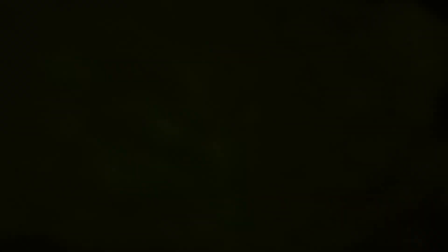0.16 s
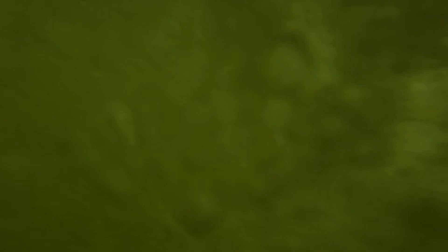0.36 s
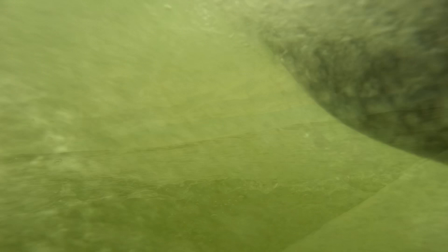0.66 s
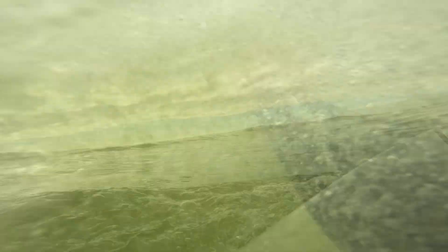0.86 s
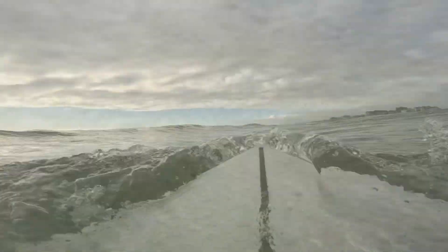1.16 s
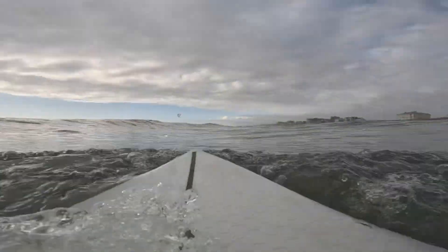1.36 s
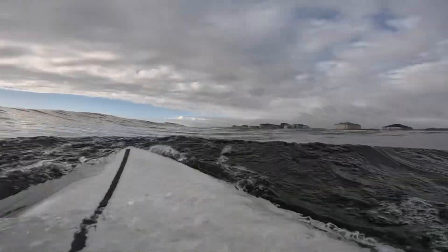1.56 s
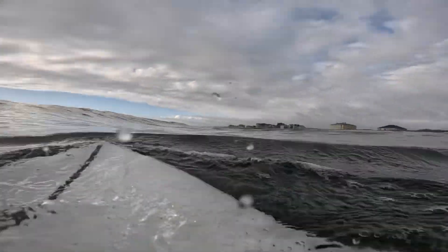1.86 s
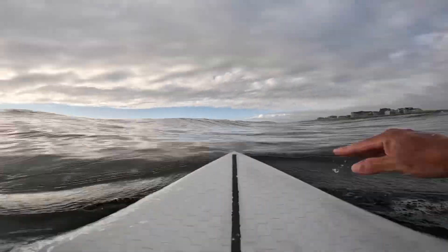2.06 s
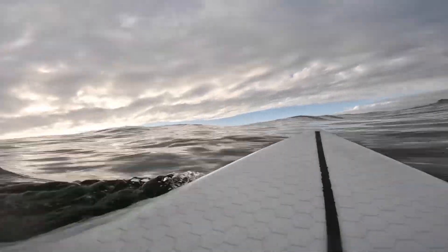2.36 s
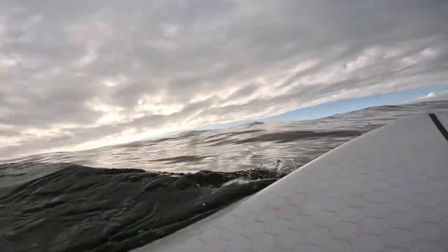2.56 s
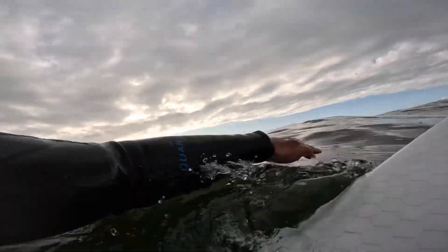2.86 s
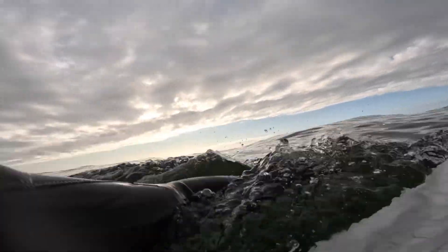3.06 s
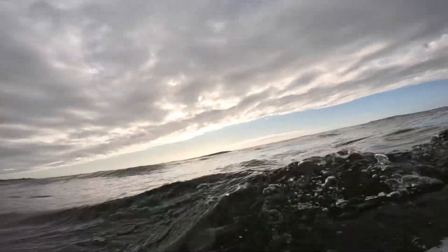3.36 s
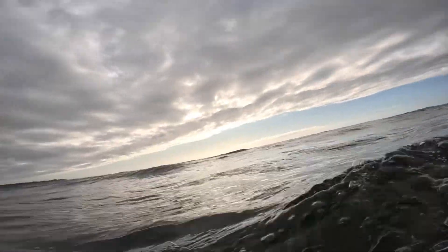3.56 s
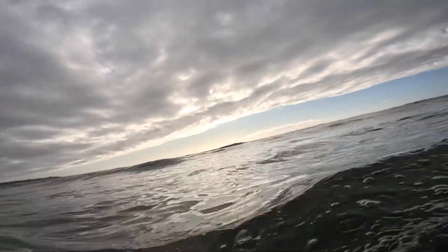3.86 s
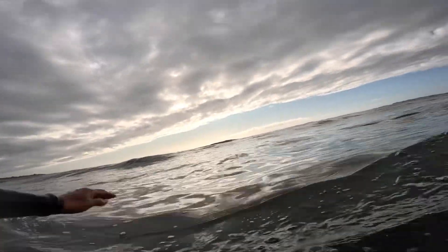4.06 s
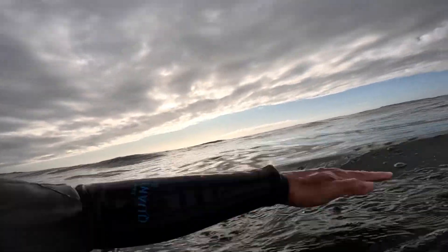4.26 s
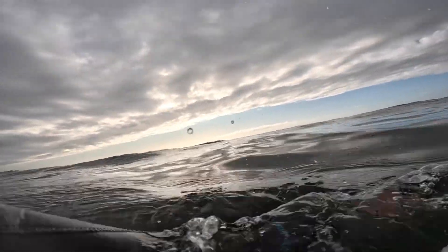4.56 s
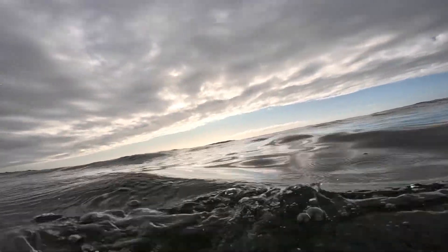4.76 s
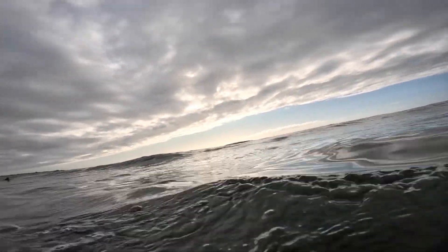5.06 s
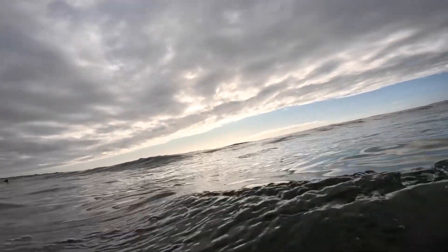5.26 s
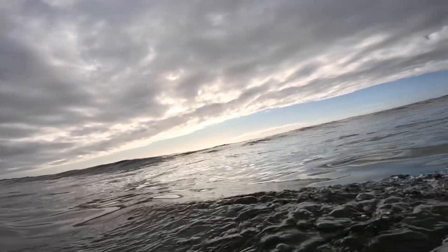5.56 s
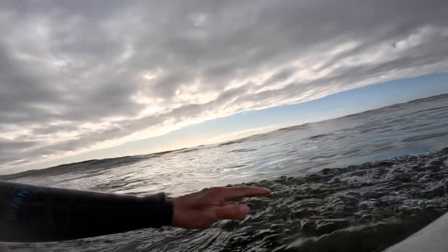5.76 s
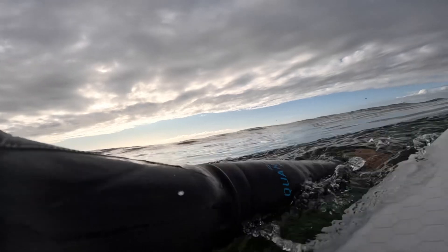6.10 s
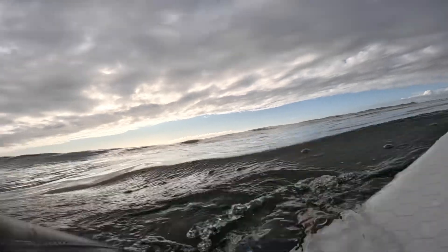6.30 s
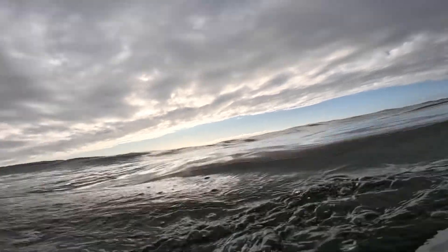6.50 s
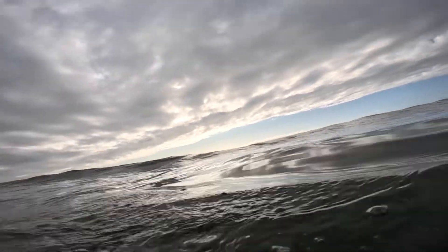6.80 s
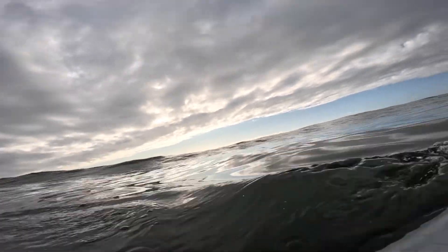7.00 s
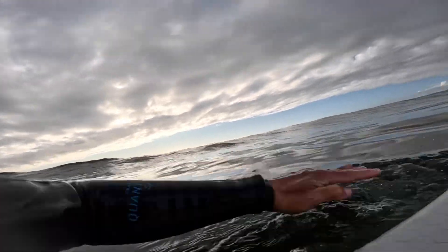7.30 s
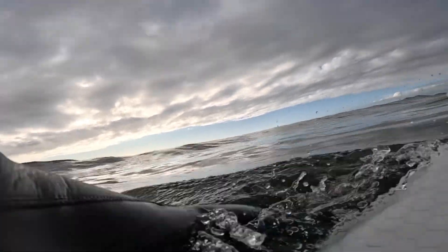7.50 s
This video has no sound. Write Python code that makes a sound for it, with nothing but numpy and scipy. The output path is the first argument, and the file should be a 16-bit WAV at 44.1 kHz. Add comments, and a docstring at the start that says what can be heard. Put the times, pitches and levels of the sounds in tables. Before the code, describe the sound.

Broken wave water roars dully and gurgles around a board, thins briefly, then breaks into thick bubbling and draining as it comes up. A booming knock, wet splats and a tight cluster of hull slaps come next. The open sea then quietens to soft washing, small drops and low swell rumble, broken by short paddle splashes and hollow knocks. Close, muffled microphones, nearly mono, widening late.

```python
"""A surfboard booms and rings under slaps as it comes up out of whitewater and is paddled over small waves.
Each slap is a short push that excites the decaying modes of the board, spread in time by dispersion.
Splats on the housing are short noise bursts; plops of trapped air are decaying tones that rise in pitch.
Water gurgles, washes, sprays and foams as shaped noise mixed with many small ringing bubbles or drops.
Behind them lie a hollow hiss, thrum, rumble and heave, heard through two close, wet microphone ports."""
import sys
import numpy as np
from scipy import signal
from scipy.fft import rfft, irfft, next_fast_len
from scipy.io import wavfile
from scipy.ndimage import uniform_filter1d

SR = 44100
rng = np.random.default_rng(int(sys.argv[2]) if len(sys.argv) > 2 else 0)


def bounce(signal):
    """Save signal as a 16-bit WAV file at the path given by the first command-line argument."""
    frames = np.transpose(np.atleast_2d(signal))
    limited = np.clip(frames, -1, 1)
    pcm = np.round(limited * 32767).astype(np.int16)
    wavfile.write(sys.argv[1], SR, pcm)


N = 336924   # length [samples]

# Slaps on the hull: (time [s], push level [dB], extra level of the lowest mode [dB], contact [ms])
SLAPS = [(0.74, -25, -22.5, 2.2), (0.78, -21.5, -1.5, 2.4), (1.097, -18, -20.5, 1.1),
         (1.187, -11, -30, 2.8), (1.434, -0.5, -25, 1.68), (1.579, -18, -19, 1.5), (1.772, -19, -19, 1.6),
         (1.852, -16.5, -19, 2.1), (1.896, -17, 3.5, 0.71), (2.075, -11.5, -50, 0.99),
         (2.176, -18, -10.5, 1.5), (2.487, -22, -11, 0.74), (2.557, -7, -29, 1.4), (2.578, -7.5, -5, 0.24),
         (2.655, -4, -1.5, 0.87), (2.753, -7, -13, 1), (2.785, -3, -7, 3.2), (2.847, -1, -25.5, 1.97),
         (2.876, -3.5, -13.5, 3.5), (2.921, -8.5, 4, 5.3), (4.138, -2.5, -14.5, 2.6),
         (4.279, -14.5, -15, 1.46), (4.322, -22.5, -13, 2), (4.385, -23.5, -9, 2.7), (5.854, -4, -5, 1.96),
         (5.967, -13, -8.5, 1.2), (5.995, -14, -34, 1.5), (6.016, -5, -7, 3.3), (6.047, -9, -21.5, 3.7),
         (7.277, -22.5, -18, 0.41), (7.412, -9, -8, 1.1), (7.445, -7, -24.5, 3), (7.472, -7.5, 4.5, 3.8),
         (7.506, -7.5, -3, 1.52)]
# Modes of the board: (frequency [Hz], level [dB], decay by 60 dB [s])
BOARD_MODES = [(58.6, -3, 0.43), (113, -4.5, 0.076), (145, -5.5, 0.042), (222.7, -3, 0.12),
               (364, -2, 0.018), (529, -13, 0.01), (800, -7, 0.0035), (970, -5, 0.02)]
# The wave front: a short falling sweep into a thump
SWEEP_DB, SWEEP_LOW_HZ, SWEEP_HIGH_HZ = 22, 124, 650
# Bending waves: travel time scale at the fourth mode; frequency of zero lag; all below the slowest arrive together
TRAVEL_S, FIRST_HZ, SLOWEST_HZ = 0.0061, 720, 261

# Splats of water on the housing: (time [s], level [dB], centre [Hz], decay by 60 dB [s])
SPLATS = [(.0698, -19, 3140, 0.12), (.14, -19, 3400, 0.024), (.8487, -24.5, 6500, 0.054),
          (.882, -35, 6500, 0.015), (1.1033, -27.5, 5000, .026), (1.1797, -24.5, 2720, .03),
          (1.203, -35, 12000, .008), (1.25, -38, 4080, 0.024), (1.5277, -28, 3180, 0.075),
          (1.6023, -29.5, 5630, 0.06), (1.857, -37, 3350, .02), (1.868, -4.5, 6800, 0.018),
          (1.8665, -25.5, 4070, .012), (1.899, -13.5, 5300, .02), (1.924, -14, 6900, 0.0074),
          (1.964, -35, 7250, 0.014), (2.0, -34, 7300, 0.017), (2.3076, -32, 6100, 0.031),
          (2.336, -35, 5960, 0.026), (2.549, -28, 3040, .04), (2.558, -23, 3200, 0.033),
          (2.572, -31, 3140, .04), (2.586, -17.5, 3070, 0.02), (3.509, -28, 3730, 0.082),
          (3.9386, -33, 3780, 0.054), (4.4575, -25.5, 3690, 0.091), (4.7282, -38, 2640, 0.034),
          (5.7688, -32, 3890, 0.037), (5.909, -28.5, 4230, 0.041), (6.179, -33.5, 3920, 0.019),
          (6.3008, -21, 4400, 0.04), (6.411, -32.5, 3150, 0.02), (6.496, -38, 2780, 0.11),
          (6.497, -35.5, 6170, 0.018), (6.552, -30, 4900, 0.018), (6.553, -38, 7000, 0.018),
          (6.692, -31, 4250, 0.062), (6.693, -31, 6570, 0.044), (6.775, -29, 4270, 0.054),
          (6.848, -30, 5800, 0.028), (6.862, -30.5, 2740, 0.085), (6.94, -43, 4550, .025),
          (7.3695, -27, 2760, 0.021), (7.434, -25, 4200, 0.034), (7.44, -14.5, 5740, 0.056),
          (7.457, -18.5, 6700, 0.041), (7.469, -26, 2740, 0.016), (7.478, -21.5, 5400, .03),
          (7.5014, -20, 5130, 0.081), (7.6191, -25, 6180, 0.15)]
SPLAT_RISE_S = 0.008
TICK_DB, TICK_T60_S, TICK_RISE_S = -4, 0.006, 0.003   # level relative to its splat

# Plops of trapped air: (time [s], tone level [dB], nominal pitch [Hz], smack level [dB])
PLOPS = [(0.17, -24, 585, -21.5), (0.233, -25, 496, -28), (.271, -46, 570, -50), (.462, -18.5, 474, -45),
         (0.477, -14, 378, -55), (.505, -19, 563, -55), (.522, -14.5, 1820, -55), (.64, -27, 620, -42.5),
         (0.491, -18, 430, -54), (.969, -11.5, 442, -51), (0.984, -16, 516, -43), (1.005, -9, 1820, -50),
         (1.012, -12, 1200, -44), (1.019, -8.5, 830, -38), (1.03, -10, 1040, -48), (1.046, -12, 895, -49),
         (1.067, -9, 1750, -33.5), (1.085, -11, 800, -43), (1.098, -11, 474, -45), (1.136, -20, 584, -24),
         (1.158, -13.5, 650, -33), (1.249, -10.5, 1760, -34), (1.249, -20, 520, -50),
         (1.277, -14, 890, -41), (1.436, -6, 560, -34), (1.534, -14.5, 613, -33), (1.859, -10.5, 1550, -24),
         (1.899, -16.5, 620, -24.5), (1.966, -27, 610, -37), (2.074, -11, 624, -58), (2.119, -19, 630, -42),
         (2.174, -24, 630, -47), (2.489, -9, 597, -21), (2.557, -9, 556, -38.5), (2.558, -14, 2050, -35),
         (2.587, -8.5, 1940, -46), (2.589, -14, 650, -30), (2.62, -21, 950, -41), (2.655, -12.5, 574, -30),
         (2.656, -18, 1050, -53), (2.688, -19, 620, -50), (2.745, -13, 467, -37), (2.847, -24, 466, -34.5),
         (2.851, -20, 1660, -45), (2.876, -15, 900, -59), (2.888, -29, 800, -53), (2.897, -35, 600, -65),
         (2.933, -27, 494, -59), (2.991, -24, 477, -41), (4.013, -33, 580, -36), (4.141, -17.5, 503, -32.5),
         (4.274, -19.5, 1070, -32.5), (4.275, -16.5, 398, -58), (4.285, -21, 610, -60),
         (4.665, -23, 880, -37), (4.69, -20, 606, -32), (4.727, -20, 880, -32), (4.749, -18, 1630, -33),
         (5.227, -24, 535, -47), (5.33, -23.5, 860, -59), (5.411, -24.5, 870, -44),
         (5.635, -23.5, 554, -51), (5.744, -25, 1820, -46), (5.854, -34, 458, -61),
         (5.911, -18.5, 530, -33), (5.963, -16, 1130, -57), (6.045, -17.5, 1430, -43.5),
         (6.048, -23, 2930, -50), (6.159, -21, 1450, -65), (6.198, -25, 815, -36), (7.09, -23, 970, -32),
         (7.279, -21, 637, -31), (7.337, -5.5, 1920, -65), (7.336, -7, 2320, -65), (7.41, -20, 624, -31),
         (7.442, -20, 570, -32), (7.465, -25, 570, -41), (7.475, -18.5, 420, -51), (7.497, -14, 1470, -53),
         (7.507, -32, 480, -45)]
PLOP_CYCLES = 20   # nominal cycles in a decay by 60 dB

# Gushes where a hand plunges in or water pours off the deck:
# (time [s], wash level [dB], spray level [dB], foam level [dB], hold [s])
GUSHES = [(0.965, -24, -56, -62, 0.011), (0.993, -25, -63, -44, 0.093), (1.105, -26.5, -45.5, -51, 0.08),
          (1.239, -29.5, -48, -65, 0.13), (1.833, -39, -37.5, -65, 0.066),
          (2.477, -30.5, -41, -61.5, 0.024), (2.54, -31.5, -58, -38, 0.039),
          (2.602, -30.5, -55, -50, 0.016), (2.662, -30, -44, -37, 0.015), (2.738, -23, -48, -44, 0.015),
          (2.839, -24, -57, -52, 0.0089), (2.861, -36, -71, -69, 0.026), (3.904, -40, -49, -61, 0.068),
          (4.265, -38.5, -63, -68, 0.082), (4.427, -56, -37.5, -74, 0.042), (4.668, -37, -40, -71, 0.049),
          (5.57, -51, -42.5, -59, .08), (5.96, -31, -53, -56, 0.041), (6.024, -37.5, -39.5, -55, 0.035),
          (6.178, -43, -56, -67, 0.12), (6.227, -45, -40, -67, 0.06), (7.078, -41.5, -43.5, -77, 0.05),
          (7.409, -32, -33, -56.5, 0.062)]
GUSH_RISE_S, GUSH_FALL_DB_PER_S = 0.0096, 116
GUSH_SHORT_FALL_DB = 18.5   # short gushes fall faster: this much per hold time

# Water running along the board: (time [s], wash level [dB], spray level [dB])
FLOW = [(0, -15.5, -27), (.07, -22.5, -33), (.25, -24.5, -41), (.42, -35, -51), (.58, -38.5, -56.5),
        (.75, -32, -52), (.93, -38, -43.5), (1.3, -34, -56.5), (1.42, -38, -54.5), (1.62, -39, -42),
        (2.0, -39.5, -47.5), (2.4, -38, -46), (2.7, -35.5, -45), (2.84, -40.5, -46.5), (3.2, -46, -54.5),
        (3.45, -40.5, -44.5), (3.65, -45.5, -53), (4.05, -37.5, -46), (4.16, -44.5, -55),
        (4.3, -47.5, -52.5), (4.6, -39.5, -42), (5.0, -44.5, -47.5), (5.17, -44, -50), (5.62, -39, -46),
        (6.2, -41.5, -46), (6.36, -50, -53), (6.55, -48, -49.5), (7.0, -42, -46), (7.64, -39, -36)]
# The whitewater passes over, the board surfaces and drains, then it is calmer:
# (time [s], gurgle level [dB], foam level [dB], hollow level [dB])
WHITEWATER = [(0, -21.5, -38.5, -32.5), (.25, -28, -37.5, -39), (.37, -26.5, -46.5, -42.5),
              (.44, -25.5, -49, -56), (.49, -18.5, -63.5, -44), (.56, -34.5, -56.5, -50),
              (.72, -31.5, -50.5, -75), (.79, -25, -46, -41), (.85, -25, -45, -56), (.9, -28, -40, -36),
              (1.07, -20, -51, -58.5), (1.2, -21.5, -46, -41), (1.36, -23, -76, -53),
              (1.45, -39.5, -45, -45), (1.8, -35.5, -55, -71), (2.3, -39.5, -55, -57),
              (3.1, -39.5, -58.5, -68)]
# Spectrum of the gurgle: (frequency [Hz], relative level per Hz [dB])
GURGLE_SPECTRUM = [(55, -15.5), (75, 4.5), (135, -2), (222, -1.5), (320, -9.5), (450, -9.5), (580, -45)]
# Spectrum of the wash: (frequency [Hz], relative level per Hz [dB])
WASH_SPECTRUM = [(200, -10), (270, -7), (382, -9.5), (544, 0), (700, -6), (1050, -10), (1790, -11.5),
                 (2020, -15.5), (2500, -24), (3700, -24)]
# Spectrum of the spray: (frequency [Hz], relative level per Hz [dB])
SPRAY_SPECTRUM = [(1700, -11.5), (2300, -5.5), (5000, -3), (9000, -11.5), (15500, -14.5)]
DROP_SHARE = 0.35   # of the spray's power that is single drops
# Spectrum of the foam: (frequency [Hz], relative level per Hz [dB])
FOAM_SPECTRUM = [(2100, -14), (2600, -4), (3250, 4.5), (3600, -5), (4400, -20)]

# Every slap stirs the water, which then settles: level relative to the slap, decay by 60 dB
STIR_GURGLE_DB, SETTLE_GURGLE_S = -13.5, 0.059
STIR_RUMBLE_DB, SETTLE_RUMBLE_S = -15.5, 0.7

# Rushes of water past a hollow of the mount: (time [s], level [dB], starting centre [Hz], hold [s])
RUSHES = [(2.12, -42.5, 1720, 0.039), (4.32, -39.5, 1620, 0.13), (7.45, -37, 1387, 0.027),
          (7.585, -54.5, 1480, .06)]
RUSH_RISE_S, RUSH_FALL_DB_PER_S = 0.032, 69
RUSH_SAG_HZ_PER_S = 760   # the pitch sinks as a rush slows
RUSH_WIDTH_HZ, RUSH_WANDER_HZ = 220, 40
HOLLOW_HZ, HOLLOW_WIDTH_HZ, HOLLOW_WANDER_HZ = 1780, 480, 110

# Deep lumpy thrum of the broken wave while the board is under: (time [s], level [dB])
THRUM_LEVEL = [(0, -30.5), (.35, -30), (.8, -39), (1.2, -34.5), (1.42, -64.5)]
THRUM_LOW_HZ, THRUM_HIGH_HZ = 90, 171
# Swell drumming on the hull: (time [s], rumble level [dB])
SWELL = [(0.0, 1), (0.06, -22), (0.13, -10), (0.94, -24.5), (1.08, -21), (1.4, -39), (1.45, -16.5),
         (2.34, -30.5), (2.38, -21.5), (2.85, -9.5), (3.3, -37.5), (3.43, -21), (3.64, -36.5), (4.32, -16),
         (4.68, -32.5), (4.72, -25), (5.21, -28.5), (6.08, -16.5), (6.28, -32), (6.34, -14.5), (6.41, -29),
         (6.57, -19.5), (6.72, -30), (7.47, -14.5), (7.51, -26), (7.64, -35)]
# Spectrum of the rumble: (frequency [Hz], relative level per Hz [dB])
RUMBLE_SPECTRUM = [(16, -3), (22, -1), (40, -9.5), (50, -0.5), (58, -6), (66, -6.5), (78, -22.5),
                   (110, -47)]
# The board heaves on the swell and presses on the ports: (time [s], level [dB])
HEAVE_LEVEL = [(0.0, -22), (0.34, -23), (0.64, -30), (2.72, -17), (3.7, -30.5), (4.83, -17), (5.81, -28),
               (5.96, -17), (7.64, -21.5)]
# Spectrum of the heave: (frequency [Hz], relative level per Hz [dB])
HEAVE_SPECTRUM = [(3, -25), (6, -7.5), (10, -2.5), (15, -4), (21, -11.5)]

# Difference between the ports, before the width is applied: (frequency [Hz], side relative to mid [dB])
PORT_GAP = [(40, -24.5), (140, -39), (320, -27.5), (490, -16), (740, -5), (1700, -11.5), (2600, -4),
            (6000, -15.5), (12000, -9.5)]
# Part of the side in phase with the mid, positive to the left: (frequency [Hz], amplitude share [1])
LEAN = [(100, 0.36), (350, 0), (700, -.35), (2600, -0.5), (4500, 0.48), (9000, 0)]
# The image is nearly mono at first, then opens out: (time [s], side gain [dB])
WIDTH = [(0, -63), (5.2, -35.5), (5.6, -17.5), (6.0, -3.5), (7.64, 2)]
# The wet membrane over the ports: (frequency [Hz], gain [dB])
MEMBRANE = [(2000, -2.5), (3000, -3), (3500, -8.5), (3900, -2), (4400, -8), (5000, -12), (6000, -10.5),
            (6900, -11.5), (8000, -17.5), (10000, -21.5), (13000, -31), (15400, -31)]
CUTOFF_HZ = 15400


def slap_pushes(mode_db, luck_db, boom_share):
    """Impulse: each contact is a smooth force pulse, and a longer contact excites less treble."""
    pushes = np.zeros(N)
    for (s, db, boom_db, ms), luck in zip(SLAPS, luck_db):
        push = np.hanning(max(round(ms * SR / 1000), 8))
        add(pushes, s, push / push.sum() * from_db(db + mode_db + luck + boom_db * boom_share))
    return pushes


def board():
    """Modal superposition and dispersion: slaps ring every mode; high bending waves arrive first."""
    luck_db = rng.normal(0, 2.4, (len(SLAPS), len(BOARD_MODES)))
    out = np.zeros(N)
    for k, (hz, mode_db, t60) in enumerate(BOARD_MODES):
        pushes = slap_pushes(mode_db, luck_db[:, k - 1], boom_share=(k == 0))
        out += ring(pushes, hz, t60) * (-1) ** k   # neighbouring modes in opposite phase
    front = slap_pushes(SWEEP_DB, luck_db[:, -1], boom_share=0)
    sweep_band = signal.butter(2, [SWEEP_LOW_HZ, SWEEP_HIGH_HZ], "band", fs=SR, output="sos")
    out -= signal.sosfilt(sweep_band, front + 1e-18)
    # travel time goes as one over the root of frequency
    size = next_fast_len(N + 2000)
    reference_hz = BOARD_MODES[3][0]
    ratio = np.clip(np.arange(size // 2 + 1) * SR / size, SLOWEST_HZ, None) / reference_hz
    lag = TRAVEL_S * np.maximum(ratio ** -.5 - np.sqrt(reference_hz / FIRST_HZ), -.2)
    # phase is the running sum of the group delay
    return filtered(out, np.exp(-2j * np.pi * np.cumsum(lag) * SR / size), size)


def splats():
    """Transient noise: a broad hiss and a narrow resonance swell and die fast, with a tick on top."""
    t, out = np.arange(4000) / SR, np.zeros(N)
    for (s, db, hz, t60), noise in zip(SPLATS, rng.standard_normal((len(SPLATS), len(t)))):
        broad = band(noise, hz / 1.12, min(hz * 1.37, 18000), order=1)
        narrow = band(noise, hz / 1.046, hz * 1.104, order=2)
        decay = from_db(-60 * np.maximum(t - SPLAT_RISE_S, 0) / max(t60, .004))
        splat = from_db(db) * (0.33 * broad + 0.25 * narrow) * soft_start(t, SPLAT_RISE_S) * decay
        add(out, s + .004 - SPLAT_RISE_S, splat)
        tick = from_db(db + TICK_DB - 60 * t / TICK_T60_S) * band(noise[::-1], 5000, 18000, order=1)
        add(out, s + 0.0028, tick * soft_start(t, TICK_RISE_S))
    return out


def plops():
    """Bubble resonance: a pocket of air rings and rises in pitch as it nears the surface, with a wet smack."""
    t, out = np.arange(4000) / SR, np.zeros(N)
    for (s, db, hz, smack_db), noise in zip(PLOPS, rng.standard_normal((len(PLOPS), len(t)))):
        t60 = PLOP_CYCLES / hz
        phase = 2 * np.pi * hz * t * (0.953 + 0.15 * t / t60)
        tone = np.sin(phase) * from_db(db - 60 * t / t60)
        smack = band(noise, 830, 2400, order=1) * from_db(smack_db - 60 * t / 0.053)
        add(out, s, (tone + smack) * soft_start(t, 0.0019))
    return out


def gurgle(level_db):
    """Bubble resonance in turbulence: low bubbles over churning noise, stirred up by each slap."""
    noise = churn(GURGLE_SPECTRUM, surge_db=-0.5, surge_rate=9.8, patchy_db=-1.5, patch_rate=3.6, count=4)
    bubbles = grains(GURGLE_SPECTRUM, per_s=160, spread_db=3.5, cycles=14.0, swell=4.2, count=8)
    return power_sum(level_db, stirred(STIR_GURGLE_DB, SETTLE_GURGLE_S)) * blend(noise, bubbles, 0.59)


def wash(level_db):
    """Turbulent flow: uneven noise and dense bubbles along the board, with gushes on top."""
    noise = churn(WASH_SPECTRUM, surge_db=1.5, surge_rate=22, patchy_db=3.5, patch_rate=11, count=11)
    bubbles = grains(WASH_SPECTRUM, per_s=2200, spread_db=3.8, cycles=14.0, swell=6.5, count=16)
    return gushing(level_db, column=1) * blend(noise, bubbles, 0.42)


def spray(level_db):
    """Random superposition: flickering treble noise and many single ringing drops."""
    noise = churn(SPRAY_SPECTRUM, surge_db=4.0, surge_rate=5.6, patchy_db=2.5, patch_rate=54, count=7)
    drops = grains(SPRAY_SPECTRUM, per_s=1100, spread_db=4.5, cycles=22, swell=22.0, count=14)
    return gushing(level_db, column=2) * blend(noise, drops, DROP_SHARE)


def foam(level_db):
    """Bubble resonance: dense small bubbles in a narrow range of sizes ring over a hiss."""
    hiss = churn(FOAM_SPECTRUM, surge_db=7.5, surge_rate=45, patchy_db=6.0, patch_rate=12, count=3)
    fizz = grains(FOAM_SPECTRUM, per_s=3200, spread_db=7.5, cycles=16, swell=6.6, count=6)
    return gushing(level_db, column=3) * blend(hiss, fizz, 0.31)


def hollow(steady_db):
    """Cavity resonance: a broad flickering hiss, and rushes of narrower hiss that sink in pitch."""
    t, hz, levels = np.arange(N) / SR, np.full(N, float(HOLLOW_HZ)), []
    for s, db, centre_hz, hold in RUSHES:
        levels.append(swelling(s, db, hold, RUSH_RISE_S, RUSH_FALL_DB_PER_S))
        hz[t > s] = centre_hz - RUSH_SAG_HZ_PER_S * np.minimum(t[t > s] - s, .25)
    broad_gain = from_db(steady_db + 5.2 * drift(26))
    broad = broad_gain * whistle(HOLLOW_HZ, HOLLOW_WIDTH_HZ, HOLLOW_WANDER_HZ)
    rush_gain = power_sum(*levels) * from_db(1.7 * drift(8.7))
    return broad + rush_gain * whistle(hz, RUSH_WIDTH_HZ, RUSH_WANDER_HZ)


def thrum():
    """Amplitude modulation: slow random lumps in low band-passed noise."""
    gain = from_db(in_time(THRUM_LEVEL)[0] + 2.6 * drift(9))
    return gain * band(rng.standard_normal(N), THRUM_LOW_HZ, THRUM_HIGH_HZ, order=2)


def rumble(level_db):
    """Random forcing: swell drums on the hull as bass noise, and each slap leaves slow motion behind."""
    noise = churn(RUMBLE_SPECTRUM, surge_db=-0.9, surge_rate=2.0, patchy_db=2.0, patch_rate=2.7, count=3)
    return power_sum(level_db, stirred(STIR_RUMBLE_DB, SETTLE_RUMBLE_S)) * noise


def heave():
    """Slow pressure fluctuation: the heaving board presses on the ports, mostly below hearing."""
    noise = churn(HEAVE_SPECTRUM, surge_db=-0.76, surge_rate=3, patchy_db=2.0, patch_rate=2.8, count=2)
    return noise * from_db(in_time(HEAVE_LEVEL)[0])


def stirred(below_db, t60):
    """Exponential decay: level in dB of the water that the slaps leave moving."""
    kicks = np.full(N, 1e-12)
    s, db = np.transpose(SLAPS)[:2]
    kicks[(s * SR).astype(int)] = from_db(db + below_db) ** 2
    r = from_db(-120 / (t60 * SR))   # power falls by 60 dB in t60
    power = signal.lfilter([1], [1, -r], kicks)
    # averaging over the last 600 samples softens each onset
    return 10 * np.log10(uniform_filter1d(power, size=600, origin=299) + 1e-12)


def swelling(s, db, hold, rise, fall_db_per_s):
    """Envelope: level in dB of a sound that swells, holds and fades."""
    t = np.arange(N) / SR - s
    return db + 20 * np.log10(np.clip(t / rise, 1e-4, 1)) - fall_db_per_s * np.maximum(t - rise - hold, 0)


def gushing(steady_db, column):
    """Power addition: gain of a steady flow with the gushes on top, read from one level column."""
    levels = [steady_db]
    for gush in GUSHES:
        hold = gush[-1]
        fall = max(GUSH_FALL_DB_PER_S, GUSH_SHORT_FALL_DB / hold)
        levels.append(swelling(gush[0], gush[column], hold, GUSH_RISE_S, fall))
    return power_sum(*levels)


def churn(spectrum, surge_db, surge_rate, patchy_db, patch_rate, count):
    """Modulated noise: surges lift all overlapping bands at once, patches one band alone; rms 1."""
    size = next_fast_len(N)
    hz = np.arange(1, size // 2 + 2) * SR / size
    low_hz, high_hz = spectrum[0][0], spectrum[-1][0]
    place = np.log(hz / low_hz) / np.log(high_hz / low_hz)   # 0 to 1 across the spectrum
    shape = gain_at_bins(spectrum, size) * (place > 0) * (place < 1)
    white, out = rfft(rng.standard_normal((2, size))), 0
    for k in range(count):
        weight = np.sqrt(np.clip(1 - abs(place * (count - 1) - k), 0, 1))
        # neighbouring bands use independent noise
        part = irfft(white[k % 2] * shape * weight, size)[:N]
        out = out + part * from_db(patchy_db * drift(patch_rate))
    return rms_one(out * from_db(surge_db * drift(surge_rate)))


def grains(spectrum, per_s, spread_db, cycles, swell, count):
    """Random impulses on resonators: clumped bubbles or drops each ring a few cycles at a pitch; rms 1."""
    sizes = from_db(spread_db * np.minimum(rng.exponential(1, N), 5)) * rng.choice([-1, 1], N)
    born = rng.random(N) < per_s * from_db(5 * drift(12)) / SR
    hz, db = np.transpose(spectrum)
    pitches, dealt = np.geomspace(hz[1], min(hz[-2], 10000), count), rng.integers(0, count, N)
    levels = from_db(np.interp(np.log(pitches), np.log(hz), db)) * pitches   # short rings carry less energy
    out = 0
    for k, (pitch, level) in enumerate(zip(pitches, levels)):
        clicks = sizes * born * (dealt == k)
        # two resonances in a row give each ring a soft start
        out = out + level * pitch / SR * ring(ring(clicks, pitch, cycles / pitch), pitch, swell / pitch)
    return rms_one(out)


def blend(noise, grain, share):
    """Power addition: mixes smooth noise and grains by power share."""
    share = np.clip(share, 0, 1)
    return np.sqrt(1 - share) * noise + np.sqrt(share) * grain


def whistle(hz, width_hz, wander_hz):
    """Quadrature modulation: low-passed noise carried on a wandering centre pitch; rms 1."""
    low_pass = signal.butter(2, width_hz / 2, fs=SR, output="sos")
    a, b = signal.sosfilt(low_pass, rng.standard_normal((2, N)))
    phase = 2 * np.pi * np.cumsum(hz + wander_hz * drift(5)) / SR
    return rms_one(a * np.cos(phase) + b * np.sin(phase))


def ring(clicks, hz, t60):
    """Damped resonance: a unit click sets off a decaying sine of starting height 1."""
    r, w = from_db(-60 / (t60 * SR)), 2 * np.pi * hz / SR
    return signal.lfilter([0, np.sin(w)], [1, -2 * r * np.cos(w), r * r], clicks + 1e-18)


def band(noise, low_hz, high_hz, order):
    """Band-pass filtering: noise between two frequencies, rms 1."""
    return rms_one(signal.sosfilt(signal.butter(order, [low_hz, high_hz], "band", fs=SR, output="sos"), noise))


def drift(rate):
    """Slow random process: noise at every 20th sample, low-passed twice at rate [Hz]; rms 1."""
    r = np.exp(-40 * np.pi * rate / SR)
    # the first 3000 values let the filter settle
    slow = signal.lfilter([1], [1, -2 * r, r * r], rng.standard_normal(N // 20 + 3002))[3000:]
    return np.interp(np.arange(N) / 20, np.arange(len(slow)), rms_one(slow))


def soft_start(t, rise):
    """Envelope: a squared-sine rise to 1."""
    return np.sin(np.pi / 2 * np.minimum(t / rise, 1)) ** 2


def filtered(x, response, size):
    """Linear filtering in the frequency domain; mirrored ends stay smooth."""
    padded = np.pad(x, [(0, 0)] * (x.ndim - 1) + [(1000, 1000)], "reflect", reflect_type="odd")
    return irfft(rfft(padded, size) * response, size)[..., 1000:N + 1000]


def at_bins(points, size):
    """Interpolation: a (frequency, value) table read along log frequency on an FFT grid."""
    hz, value = np.transpose(points)
    return np.interp(np.log(np.arange(1, size // 2 + 2) * SR / size), np.log(hz), value)


def gain_at_bins(points, size):
    """Frequency response: a (frequency, dB) table as gains on an FFT grid."""
    return from_db(at_bins(points, size))


def in_time(rows):
    """Interpolation: each column of a (time, ..) table at every sample."""
    s, *columns = np.transpose(rows)
    return [np.interp(np.arange(N) / SR, s, c) for c in columns]


def power_sum(*levels_db):
    """Power addition of independent sounds: levels in dB to one gain."""
    return np.sqrt(sum(from_db(db) ** 2 for db in levels_db))


def from_db(db):
    """Logarithmic level: decibels to amplitude gain."""
    return 10 ** (np.asarray(db) / 20)


def rms_one(x):
    """Normalisation: scales to rms 1."""
    return x / np.sqrt(np.mean(x ** 2) + 1e-20)


def add(out, s, piece):
    """Superposition: mixes a short sound in at time s."""
    i = round(s * SR)
    out[i:i + len(piece)] += piece[:N - i]


def scene():
    """Superposition and decorrelation: sums all sources, then spreads them over the two ports."""
    rumble_db, = in_time(SWELL)
    wash_db, spray_db = in_time(FLOW)
    gurgle_db, foam_db, hollow_db = in_time(WHITEWATER)
    hits = board() + splats() + plops()
    water = gurgle(gurgle_db) + wash(wash_db) + spray(spray_db) + foam(foam_db)
    background = hollow(hollow_db) + thrum() + rumble(rumble_db) + heave()
    mid = hits + water + background
    # the ports differ by a copy smeared over some thirty milliseconds
    size = next_fast_len(N + 2000)
    smear = rfft(rng.standard_normal(size=1400), size)
    lean = np.clip(at_bins(LEAN, size), -1, 1)
    gap = (lean + np.sqrt(1 - lean ** 2) * smear / abs(smear)) * gain_at_bins(PORT_GAP, size)
    side = filtered(mid, gap, size) * from_db(in_time(WIDTH)[0])
    return np.array([mid + side, mid - side])


def record(dry):
    """Filtering and saturation: the membrane dulls the treble, peaks are rounded, the top is cut."""
    size = next_fast_len(N + 2000)
    heard = filtered(dry, gain_at_bins(MEMBRANE, size), size)
    rounded = 0.88 * np.tanh(heard / 1.165)
    return signal.sosfilt(signal.cheby2(12, 70, CUTOFF_HZ, fs=SR, output="sos"), rounded)


dry = scene()
out = record(dry)
bounce(out)
```